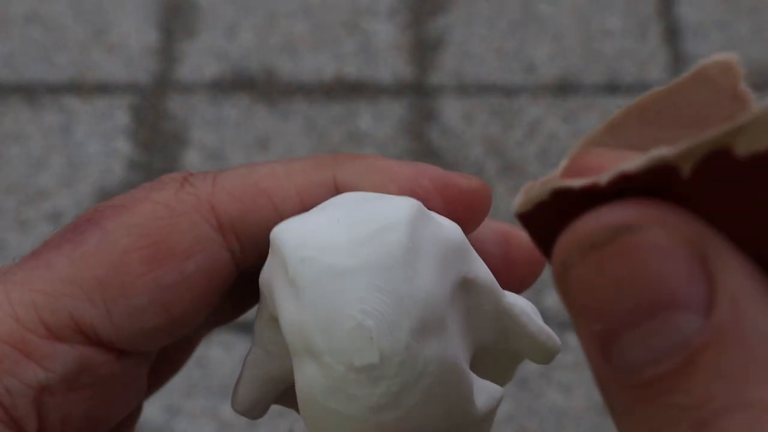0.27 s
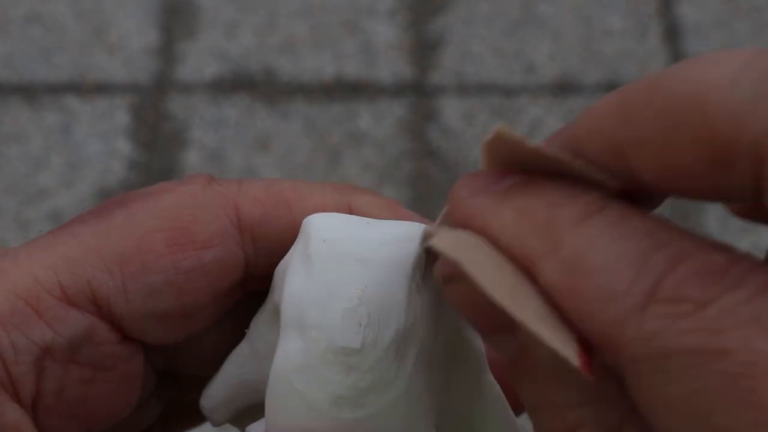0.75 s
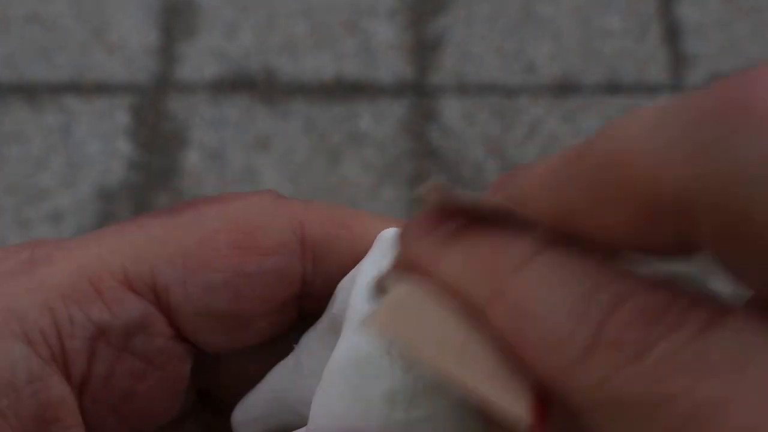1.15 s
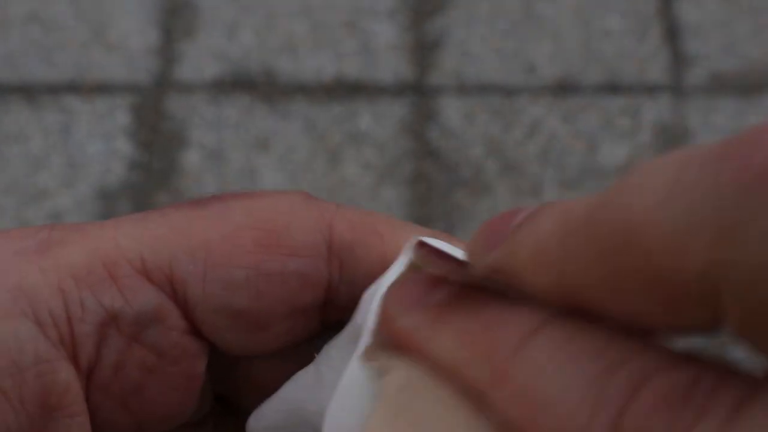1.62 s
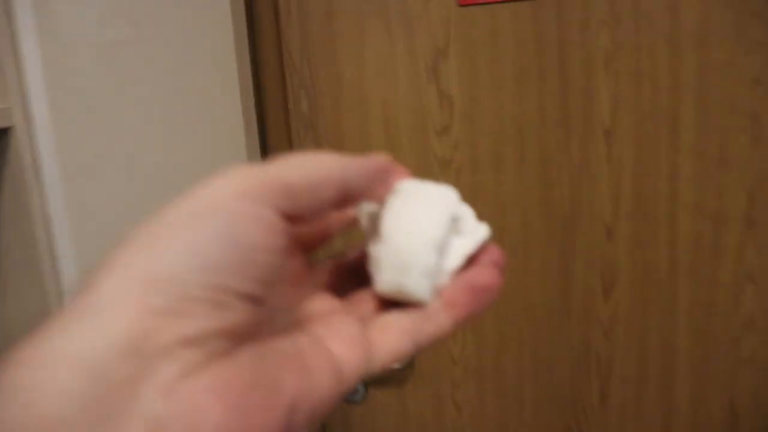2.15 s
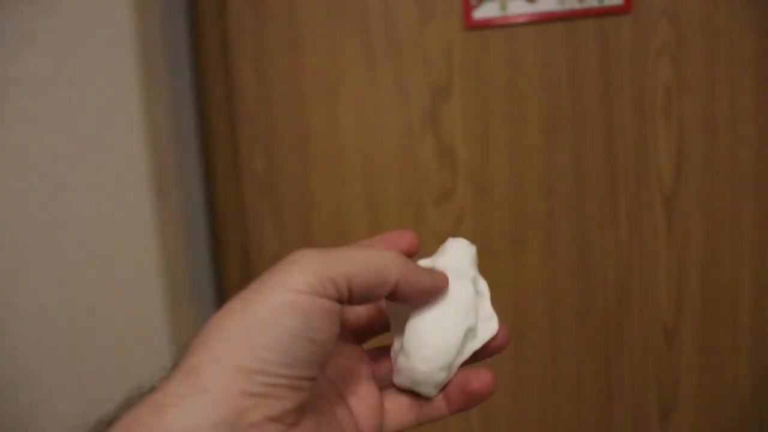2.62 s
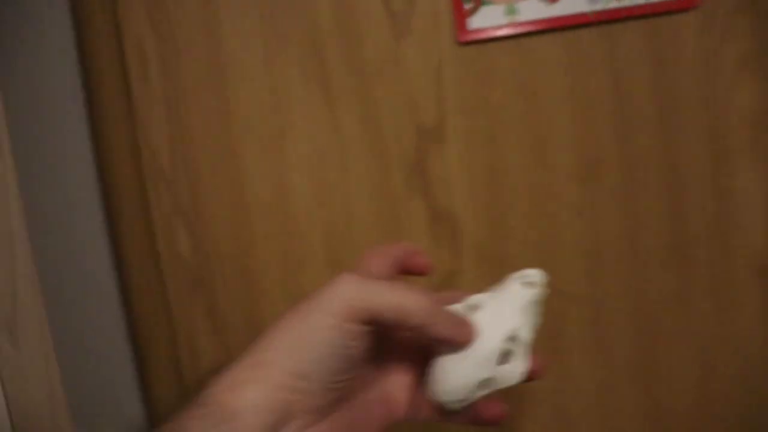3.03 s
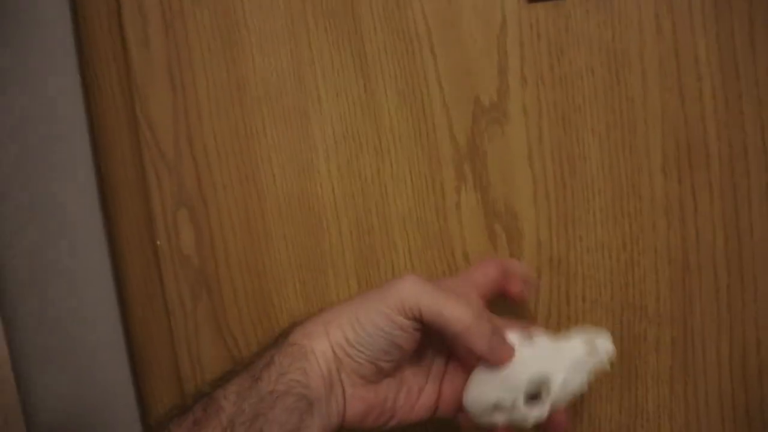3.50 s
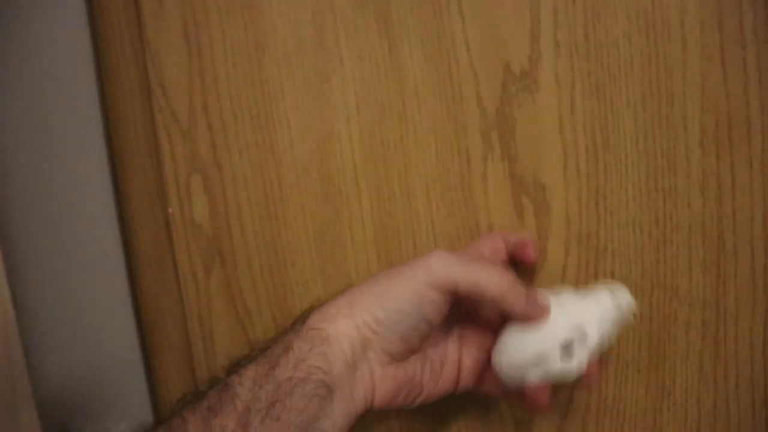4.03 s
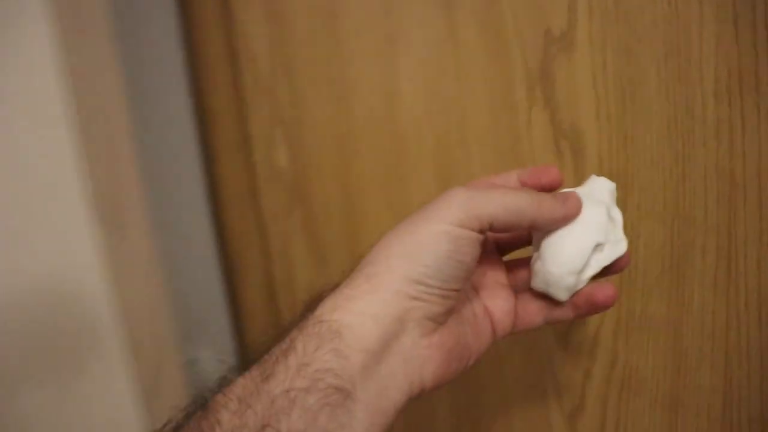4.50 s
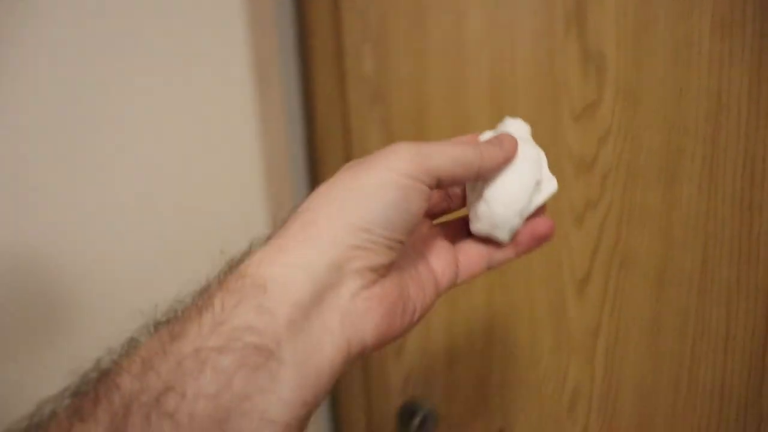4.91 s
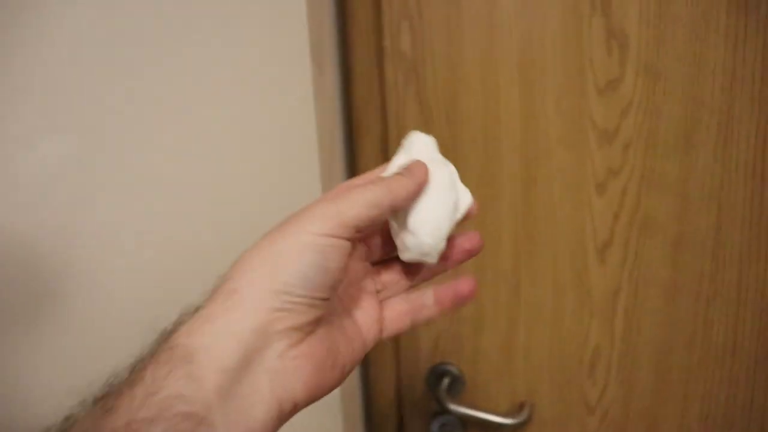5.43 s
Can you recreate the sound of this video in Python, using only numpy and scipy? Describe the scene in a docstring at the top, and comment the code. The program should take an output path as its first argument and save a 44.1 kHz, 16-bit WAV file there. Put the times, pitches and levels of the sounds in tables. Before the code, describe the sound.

Close to the microphone, sandpaper makes short, dry, gritty scrapes on a small plastic model, with sharp snags, faint warbling birds and distant town hum. Abruptly the place becomes a small quiet hallway. A sleeve rustles and fingers click on the model, then three loud, even knocks hit a wooden door. More rustling follows, with soft bumps and two crisp wooden taps at the end.

```python
"""Sanding outdoors, knocking indoors

Outdoors, sandpaper rubs a small plastic model in short strokes of filtered grit noise and ringing snags, with
warbling birds as frequency-modulated tones and a distant town as coloured noise. At 1.98 s the scene cuts to a
small hallway: a sleeve rustles as shaped noise, and a knuckle knocks three times on a wooden door, a sum of
decaying modes with echoes and reverberation. A few soft bumps and two sharp taps on wood follow."""
import sys
import numpy as np
from scipy import signal
from scipy.fft import rfft, irfft
from scipy.io import wavfile

SR = 44100
rng = np.random.default_rng(int(sys.argv[2]) if len(sys.argv) > 2 else 0)


def store_wav(level_fs):
    """Save 16-bit WAV to argv[1]."""
    pcm = np.round(np.clip(np.atleast_2d(level_fs), -1, 1) * 32767)
    wavfile.write(sys.argv[1], SR, pcm.T.astype(np.int16))


N = 249332
T = np.arange(N) / SR
RING = T[:SR]  # time axis of one second for impulse responses
CUT_S = 1.98  # outdoors before, hallway after


def undb(db):
    """Level law: decibels to an amplitude ratio."""
    return 10 ** (np.asarray(db) / 20)


def unit(x):
    """Normalization: divide by the standard deviation."""
    return x / np.std(x)


def on_log(points, hz):
    """Interpolation: read (Hz, value) points along a log-frequency axis."""
    f, value = np.transpose(points)
    return np.interp(np.log(np.maximum(hz, 1)), np.log(f), value)


def shape(x, gain):
    """Linear filtering: multiply the spectrum by a gain that is a function of frequency."""
    spectrum = rfft(x)
    hz = np.fft.rfftfreq(len(x), 1 / SR)
    return irfft(spectrum * gain(hz), len(x))


def colour(x, points):
    """Spectral colouring: filter x by (Hz, dB) points and normalize it."""
    return unit(shape(x, lambda f: undb(on_log(points, f))))


def bell(f, hz, octaves):
    """Band-pass selection: a Gaussian gain on a log-frequency axis."""
    return np.exp(-.5 * (np.log2(np.maximum(f, 1) / hz) / octaves) ** 2)


def one_pole(x, hz, kind):
    """First-order filtering: a gentle low-pass or high-pass."""
    return signal.sosfilt(signal.butter(1, hz, kind, fs=SR, output="sos"), x)


def fade(t60):
    """Exponential damping: 60 dB down after t60 seconds."""
    return np.exp(-np.log(1000) * RING / t60)


def add(out, s, x):
    """Superposition: mix x into out from time s."""
    i = int(round(s * SR))
    out[i:i + len(x)] += x[:len(out) - i]


def ring(modes, polarity=1):
    """Modal synthesis: damped cosines; a negative polarity alternates the sign from mode to mode."""
    total = np.zeros(SR)
    for k, (hz, db, t60) in enumerate(modes):
        total += polarity ** k * undb(db) * np.cos(2 * np.pi * hz * RING) * fade(t60)
    return total


def reverb(points, t60s, build_s):
    """Diffuse reverberation: coloured noise builds up, and each frequency band decays at its own rate."""
    noise = colour(rng.standard_normal(SR), points)
    centres = [hz for hz, _ in t60s]
    tail = np.zeros(SR)
    for band, (_, t60) in zip(np.eye(len(t60s)), t60s):
        weights = list(zip(centres, band))  # overlapping triangular bands
        tail += shape(noise, lambda f: on_log(weights, f)) * fade(t60)
    return tail * (1 - np.exp(-(RING / build_s) ** 2))


def strike(s, contact_ms, response):
    """Impact excitation: a Gaussian push drives a response, and a longer contact is duller."""
    blow = np.zeros(N)
    add(blow, s, response)
    return shape(blow, lambda f: np.exp(-.5 * (2 * np.pi * f * contact_ms / 1000) ** 2))


def grains(per_s, spread_db):
    """Random impulse process: sparse clicks of Gaussian size, rescaled by an exponential draw in dB."""
    clicks = (rng.random(N) < per_s / SR) * rng.standard_normal(N)
    return clicks * undb(spread_db * np.minimum(rng.exponential(size=N), 5))


def flutter(per_s, depth_db):
    """Random amplitude modulation: a gain that takes a new value per_s times a second."""
    knots = np.arange(0, T[-1] + 1, 1 / per_s)
    return undb(depth_db * np.interp(T, knots, rng.standard_normal(N)[:len(knots)]))


def rub(moves, texture, pivot_hz, roundness, peak_share):
    """Friction noise: each move swells and dies away, with its own balance of treble to bass."""
    low = shape(texture, lambda f: 1 / (1 + (f / pivot_hz) ** 2))
    high = texture - low
    out = np.zeros(N)
    for start, length, db, bright_db in moves:
        swing = np.interp((T - start) / length, [0, np.clip(peak_share, .1, .9), 1], [0, 1, 0])
        envelope = np.sin(np.pi / 2 * swing) ** roundness
        out += undb(db) * envelope * unit(low + undb(bright_db) * high)
    return out


def background():
    """Stationary coloured noise: town, then hallway hiss, with low rumble and puffs of air on the microphone."""
    # Spectra of town, hiss, rumble and puffs. Each row: frequency in Hz, relative level in dB.
    town_colour = [(41, -19), (70, -11), (152, -12), (376, -8.5), (431, -12), (679, -6.5), (834, -12.5),
                   (1000, -7), (2320, -24), (3110, -30), (3650, -31), (5140, -39.5), (16000, -48.5)]
    hiss_colour = [(50, -17), (100, -1.5), (200, -0.5), (400, -4), (700, -5.5), (1200, -10), (2500, -12.5),
                   (5000, -14.5), (9000, -17), (12000, -17.5), (16000, -19.5)]
    rumble_colour = [(5, -17.5), (12, 9.5), (30, -7.5), (50, -11.5), (90, -23.5), (200, -41.5), (500, -93)]
    puff_colour = [(8, -7), (30, 1), (50, -6), (90, -24.5), (200, -43), (500, -90)]
    # Puffs of air. Each row: peak time in seconds, level in dB, time constant of swell and decay in seconds.
    puffs = [(.34, -37, 0.18), (1.77, -47.5, .09), (4.19, -47, 0.048), (4.68, -46, .09),
             (5.51, -37.5, 0.039)]
    town_db, hiss_db = -56.5, -62
    rumble_out_db, rumble_in_db = -65, -48
    town = undb(town_db) * colour(rng.standard_normal(N), town_colour)
    hiss = undb(hiss_db) * colour(rng.standard_normal(N), hiss_colour)
    rumble_gain = undb(np.where(T < CUT_S, rumble_out_db, rumble_in_db))
    rumble = rumble_gain * colour(rng.standard_normal(N), rumble_colour)
    air = sum(undb(db) * np.exp(-np.abs(T - s) / swell_s) for s, db, swell_s in puffs)
    gusts = air * colour(rng.standard_normal(N), puff_colour)
    return np.where(T < CUT_S, town, hiss) + rumble + gusts


def birds():
    """Frequency modulation: a warbling two-note call at different pitches, blurred by walls around the yard."""
    # Notes of the call. Each row: delay in seconds, length in seconds, first and last pitch as ratios,
    # relative level in dB. The first note falls, the lower second one rises.
    call_notes = [(0, 0.066, 1.12, 0.8, 1), (.092, 0.051, .79, .93, -2.5)]
    # Calls. Each row: start in seconds, reference pitch in Hz, relative level in dB.
    calls = [(.15, 5300, -62.5), (.634, 5200, -68.5), (.868, 4530, -64), (0.904, 3890, -65)]
    warble_hz, warble_depth = 45, .06
    out = np.zeros(N)
    for s, pitch_hz, db in calls:
        for delay, length, first, last, note_db in call_notes:
            glide = pitch_hz * np.linspace(first, last, int(length * SR))
            warble = np.sin(2 * np.pi * (warble_hz * RING[:len(glide)] + rng.random()))
            hz = glide * (1 + warble_depth * warble)
            tone = np.sin(2 * np.pi * np.cumsum(hz) / SR)
            add(out, s + delay, undb(db + note_db) * np.hanning(len(hz)) * tone)
    yard = rng.standard_normal(SR) * fade(0.36)
    echo = signal.fftconvolve(out, yard / np.linalg.norm(yard))[:N]
    return undb(-1.0) * out + undb(0.5) * echo


def handling():
    """Friction and contact noise: a sleeve rustles indoors, fingers slip on the model, soft thumps sound."""
    # Sleeve and hand movements, heard from the cut on.
    # Each row: start in seconds, length in seconds, relative level in dB, treble against bass in dB.
    swishes = [(1.7, 1.97, -55.5, -1.5), (2.25, 0.2, -50.5, -5), (2.36, .27, -52, -16),
               (2.67, 0.081, -52.5, 0), (2.67, 0.21, -60, 4), (2.82, 0.25, -59.5, -6),
               (3.995, 0.047, -59.5, 9), (4.163, 0.08, -59, 11), (4.29, 0.21, -57.5, -7),
               (4.39, 0.14, -52.5, -8), (4.48, 0.79, -58, -3), (5.06, 0.32, -51, -5),
               (5.3, 0.67, -53.5, -8), (5.36, 0.072, -52, 25)]
    # Spectrum of the cloth. Each row: frequency in Hz, relative level in dB.
    cloth_colour = [(240, -23), (400, -9), (593, -9.5), (745, -6), (994, -4.5), (1520, -5.5), (2390, -5),
                    (8430, -9.5), (9810, -15.5), (15000, -20.5)]
    # Fingers slipping and ticking on the model.
    # Each row: start in seconds, peak level in dB, centre in Hz, width in octaves, t60 in seconds.
    slips = [(2.271, -25.5, 6570, 0.54, 0.12), (2.272, -38, 1050, 0.59, 0.1),
             (2.431, -43.5, 1050, 0.18, 0.14), (2.478, -28.5, 1163, 0.3, 0.04),
             (5.119, -39.5, 4500, 0.73, 0.028), (5.1315, -35.5, 6640, 0.41, 0.06),
             (5.176, -42, 2680, 0.18, 0.13)]
    # Soft thumps of the hand. Each row: start in seconds, relative level in dB.
    thumps = [(2.642, -55.5), (2.901, -61), (4.568, -49)]
    cloth = colour(grains(per_s=18000, spread_db=0.5), cloth_colour) * flutter(per_s=120, depth_db=0.6)
    rustle = rub(swishes, cloth, pivot_hz=3500, roundness=1.45, peak_share=0.37)
    out = undb(-1.52) * rustle * (T >= CUT_S)
    for s, db, hz, octaves, t60 in slips:
        slip = shape(rng.standard_normal(SR), lambda f: bell(f, hz, octaves)) * fade(t60)
        add(out, s, undb(db) * slip / np.abs(slip).max())
    for s, db in thumps:
        thump = unit(shape(rng.standard_normal(SR), lambda f: bell(f, 116, 0.17)))
        envelope = fade(0.31) * (1 - fade(0.037))  # soft onset
        add(out, s, undb(db) * thump * envelope)
    return out


def taps():
    """Double impact: each bump or tap on wood is a light touch, then a heavier, softer landing."""
    # Bumps and taps. Each row: touch time in seconds, relative level in dB, contact time of the touch in ms,
    # delay until the full weight lands in ms.
    tap_events = [(5.105, -13, 0.41, 10.6), (5.223, -13, 0.29, 13), (5.280, -12, 0.13, 9),
                  (5.3021, -11, 0.024, 5.7), (5.508, -12.5, 0.11, 4), (5.515, -4, 0.028, 4.43)]
    # Modes of the wood. Each row: frequency in Hz, relative level in dB, t60 in seconds.
    wood_modes = [(78.7, -36, 0.22), (124, -53, 0.14), (214.6, -36.5, 0.17), (311.3, -31.5, 0.14),
                  (461, -36, 0.17), (574, -37, 0.11), (719, -32.5, 0.073), (830, -28.5, 0.13),
                  (948, -38, 0.085), (1083, -41, 0.08), (1162, -24, 0.079), (1230, -46, 0.055),
                  (1440, -57, 0.087), (1667, -29.5, 0.082), (2054, -39, 0.073), (5110, -45, 0.15)]
    # Spectrum of crack and reverberation. Each row: frequency in Hz, relative level in dB.
    crack_colour = [(100, 3.5), (400, -0.5), (1200, 2), (1900, -4.5), (2800, -8), (5500, -7.5),
                    (8000, -10.5), (15000, -31)]
    # Reverberation time. Each row: frequency in Hz, t60 in seconds.
    tail_t60s = [(100, 0.36), (400, 0.24), (1300, 0.18), (2500, 0.15), (6000, 0.18), (14000, 0.13)]
    landing_db, landing_softer = 4.5, 2.5  # against the touch: level in dB, ratio of contact times
    out = np.zeros(N)
    wood = ring(wood_modes, polarity=-0.98)
    for s, db, contact_ms, lag_ms in tap_events:
        touch = (s, db, contact_ms)
        landing = (s + lag_ms / 1000, db + landing_db, contact_ms * landing_softer)
        for at, blow_db, blow_ms in (touch, landing):
            crack = undb(-18.5) * colour(rng.standard_normal(SR), crack_colour) * fade(0.03)
            tail = undb(-27.5) * reverb(crack_colour, tail_t60s, build_s=0.0041)
            out += undb(blow_db) * strike(at, blow_ms, crack + wood + tail)
    return out


def sandpaper():
    """Stick-slip friction: grit scratches the plastic, and now and then a coarse grain snags and snaps free."""
    # Strokes, and fingers shifting on the model before sanding.
    # Each row: start in seconds, length in seconds, relative level in dB, treble against bass in dB.
    strokes = [(0.788, 0.089, -43, -12), (1.027, 0.057, -38, 7), (1.177, 0.018, -49, -13),
               (1.241, 0.034, -35, 5.5), (1.262, 0.038, -54, 4), (1.325, 0.063, -52.5, 7),
               (1.392, 0.073, -45.5, 1), (1.460, 0.1, -42.5, -2), (1.568, 0.081, -48.5, 1),
               (1.657, 0.081, -44, 1), (1.743, 0.066, -52, 3), (1.813, 0.074, -45.5, 3),
               (1.900, 0.068, -49, 2)]
    regrips = [(.14, 0.08, -78.5, 4), (.22, .1, -80.5, 4), (.42, 0.088, -79.5, 6)]
    # Coarse grit catching on the plastic. Each row: start in seconds, peak level in dB.
    snags = [(.737, -55), (.993, -42), (1.185, -31.5), (1.370, -18.5), (1.491, -32), (1.691, -32),
             (1.723, -32), (1.834, -28), (1.913, -38)]
    # Spectrum of the grit. Each row: frequency in Hz, relative level in dB.
    grit_colour = [(710, -32), (1200, -9.5), (1640, -9), (1890, -11.5), (2650, -9), (2890, -6.5),
                   (3470, -7.5), (3870, -6.5), (6870, -6.5), (8350, -3), (10100, -13), (13000, -11),
                   (16000, -21)]
    peak_share = 0.52  # share of a stroke spent speeding up
    resting_db = -70.5  # the paper in light contact between strokes
    # modes of one snap: frequency in Hz, relative level in dB, t60 in seconds
    snap = ring([(7760, 3.5, 0.003), (9050, 6.5, 0.0018), (12800, -4, .004)], polarity=-0.91)
    grit = colour(grains(per_s=5000, spread_db=-0.5), grit_colour) * flutter(per_s=240, depth_db=2.5)
    coarse = unit(signal.fftconvolve(grains(per_s=350, spread_db=0.0), snap)[:N])
    texture = grit + undb(-8) * coarse
    out = undb(-0.6) * rub(strokes, texture, pivot_hz=6000, roundness=1.46, peak_share=peak_share)
    out += rub(regrips, grit, pivot_hz=6000, roundness=0.99, peak_share=peak_share)
    # once the strokes come quickly, the paper no longer lifts off
    out += undb(resting_db) * grit * (T > 1.19) * (T < CUT_S)
    for s, db in snags:
        add(out, s, undb(db) * snap / np.abs(snap).max())
    return out


def knocks():
    """Modal impact response: the panel heaves, near walls echo it, then door and hallway ring, alike each time."""
    # Knuckle blows. Each row: start in seconds, relative level in dB, contact time in ms,
    # weight of the hand behind it as a bass gain in dB.
    blows = [(3.739, 0.9, 0.33, -2), (3.9407, -1, 0.31, -2), (4.1382, -0.5, 0.34, 2)]
    # The panel's heavily damped first heave, then the lasting door modes.
    # Each row: frequency in Hz, relative level in dB, t60 in seconds.
    heave_modes = [(140, -2, 0.016), (411, -8, 0.11), (687, -8.5, 0.029)]
    door_modes = [(67.2, -31.5, 0.58), (77.3, -30.5, 0.54), (100.7, -32.5, 0.23), (124, -53, 0.78),
                  (151, -51, 0.71), (172.5, -33, 0.35), (206, -29, 0.28), (264.6, -33, 0.21),
                  (275, -30, 0.27), (301, -24.5, 0.093), (358.5, -26, 0.1), (383, -28, 0.14),
                  (422, -49, 0.126), (456, -30.5, 0.19), (529, -34, 0.16), (562, -27, 0.14),
                  (619, -17, 0.087), (675, -32.5, 0.2), (729, -32, 0.15), (767, -20, 0.069),
                  (829, -34, 0.23), (868, -21, 0.11), (918, -28, 0.18), (1063, -31, 0.25),
                  (1149, -8, 0.046), (1230, -38.3, 0.169), (1224, -22, 0.15), (1520, -49.0, 0.144)]
    # Near surfaces of the hallway. Each row: delay in ms, relative level in dB.
    echoes = [(3.8, 0.2), (6.4, -7), (7.4, -8.5), (10.1, -4.5), (13.3, -2.5), (16.7, -4)]
    # Reverberation colour. Each row: frequency in Hz, relative level in dB.
    hall_colour = [(40, -17), (90, 5), (250, 0), (600, -2), (900, 4.5), (1300, 3.5), (2000, -8),
                   (4000, -20)]
    # Reverberation time. Each row: frequency in Hz, t60 in seconds.
    hall_t60s = [(60, 0.49), (250, 0.29), (700, 0.2), (2000, 0.27), (6000, 0.26), (14000, 0.22)]
    heave = ring(heave_modes)
    hall = undb(-22) * reverb(hall_colour, hall_t60s, build_s=0.011)
    door = heave + ring(door_modes, polarity=-1.013) + hall
    slap = one_pole(heave, 272, "high")
    for ms, db in echoes:
        add(door, ms / 1000, undb(db) * slap)
    door = one_pole(door, 94, "high")  # a panel radiates its deepest motion poorly
    bass = one_pole(door, 220, "low")
    # the bone under the skin adds a faint tick
    tick_colour = [(500, -10), (1600, 4.0), (3000, -10.5), (9000, -28)]  # (Hz, dB)
    tick = undb(-51) * colour(rng.standard_normal(SR), tick_colour) * fade(0.094)
    out = np.zeros(N)
    for s, db, contact_ms, weight_db in blows:
        weighted = door + (undb(weight_db) - 1) * bass
        out += undb(db) * strike(s, contact_ms, weighted)
        add(out, s, undb(db) * tick)
    return out


def scene():
    """Superposition: the pressures of all sources add at one microphone."""
    return (background() + birds() + handling() + taps() + sandpaper() + knocks())[None]


def record(dry):
    """Band limiting: a steep elliptic low-pass cuts the top above 16 kHz."""
    return signal.sosfilt(signal.ellip(10, .2, 70, 16000, fs=SR, output="sos"), dry)


dry = scene()
out = record(dry)
store_wav(out)
```